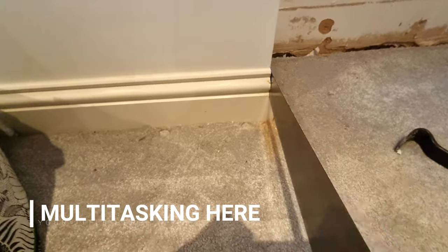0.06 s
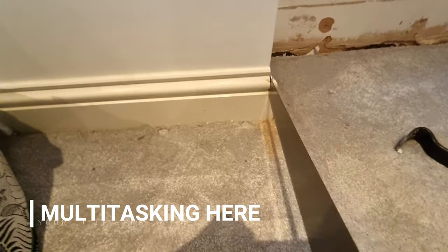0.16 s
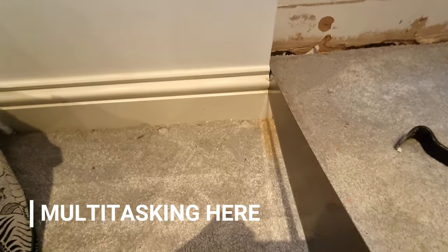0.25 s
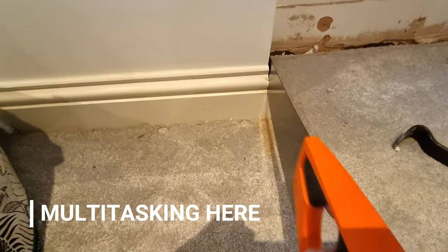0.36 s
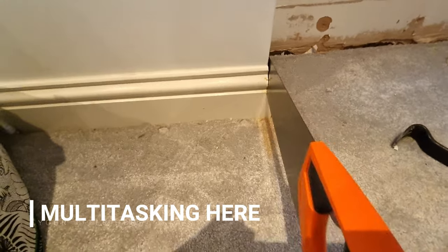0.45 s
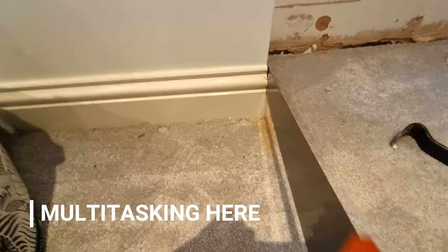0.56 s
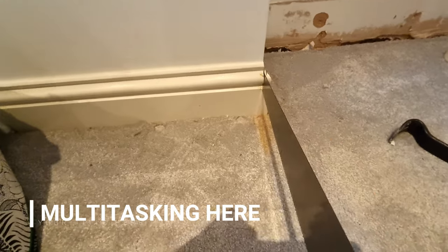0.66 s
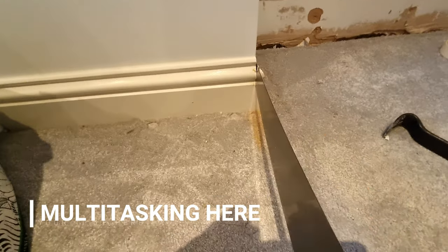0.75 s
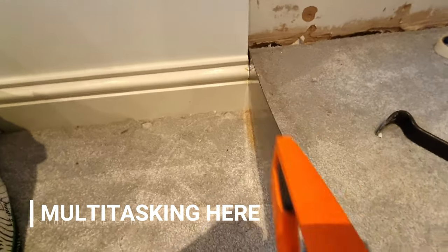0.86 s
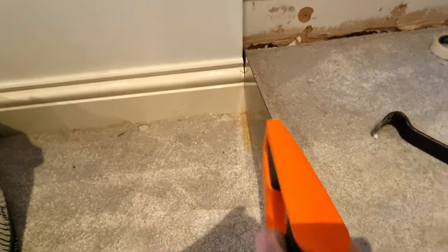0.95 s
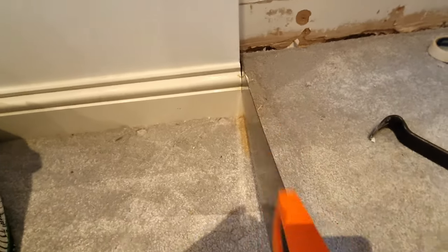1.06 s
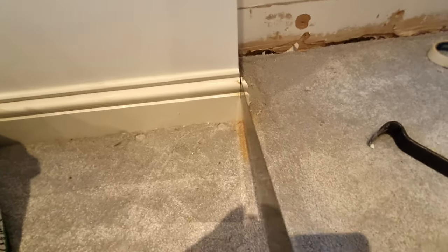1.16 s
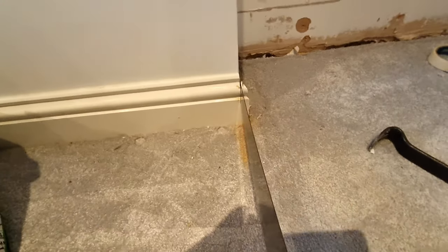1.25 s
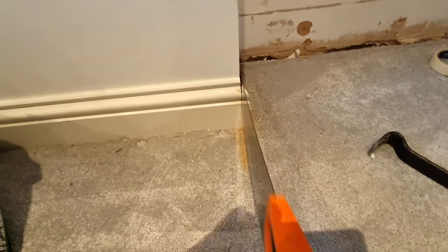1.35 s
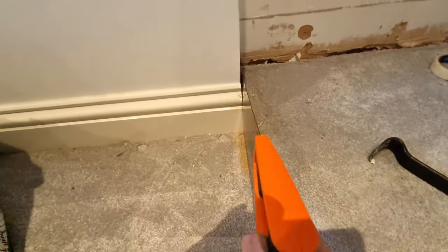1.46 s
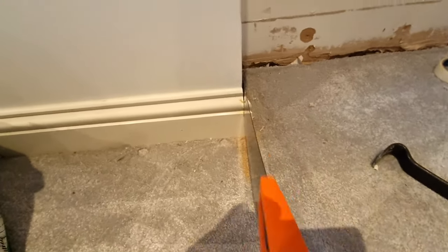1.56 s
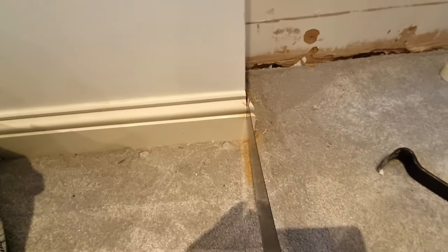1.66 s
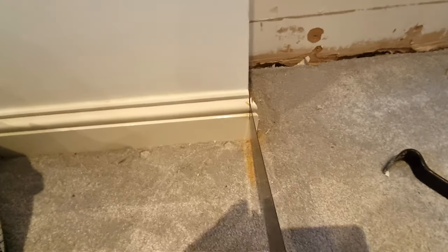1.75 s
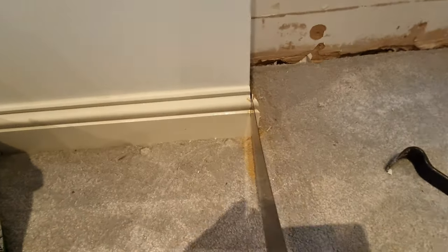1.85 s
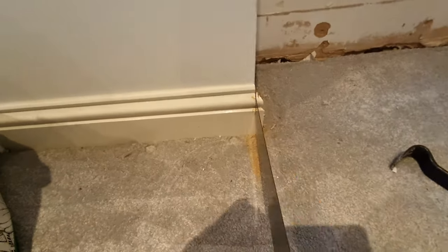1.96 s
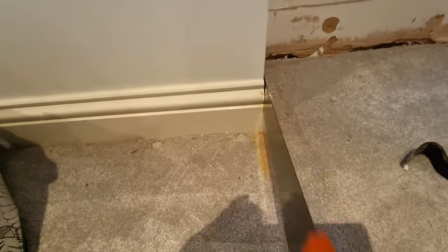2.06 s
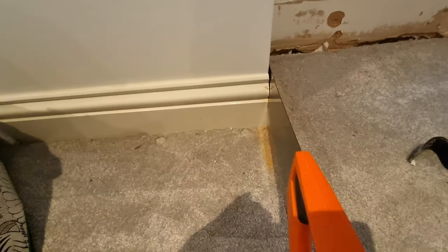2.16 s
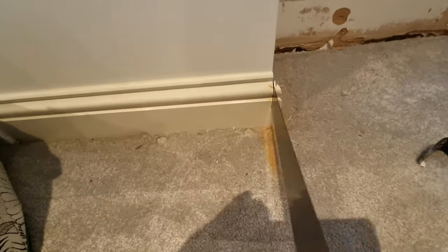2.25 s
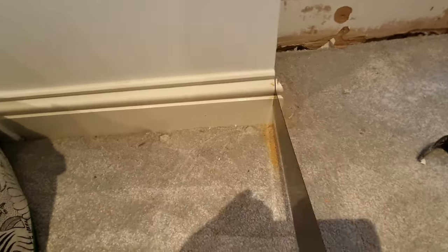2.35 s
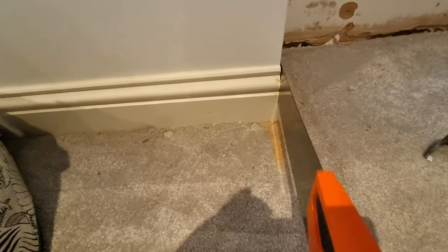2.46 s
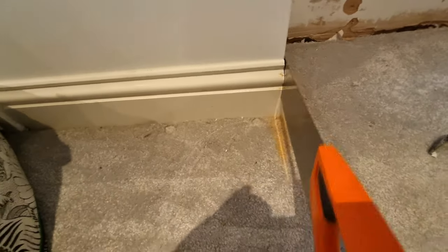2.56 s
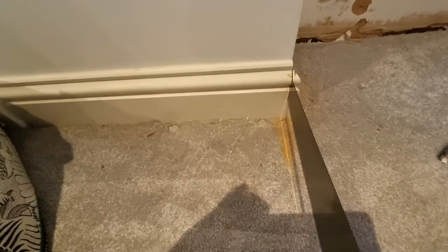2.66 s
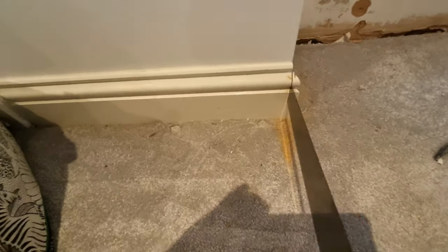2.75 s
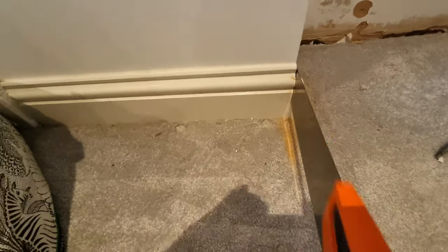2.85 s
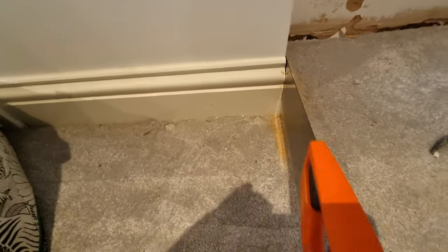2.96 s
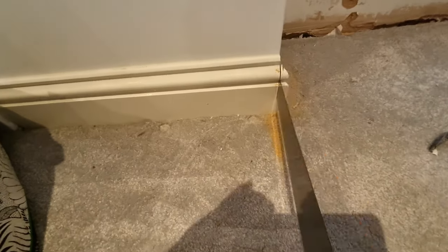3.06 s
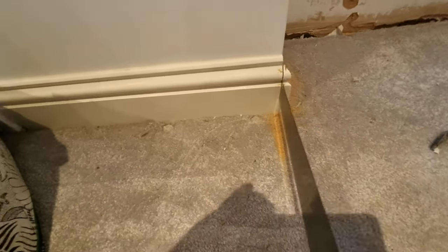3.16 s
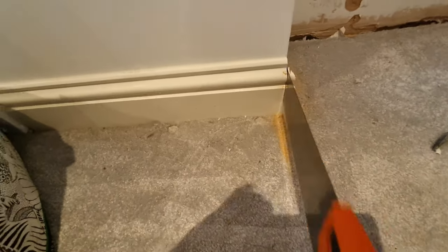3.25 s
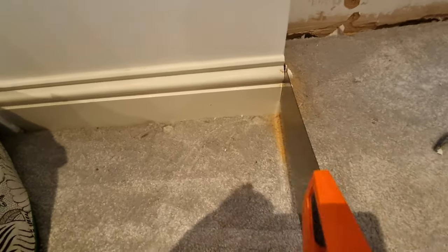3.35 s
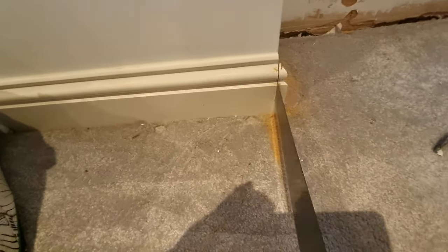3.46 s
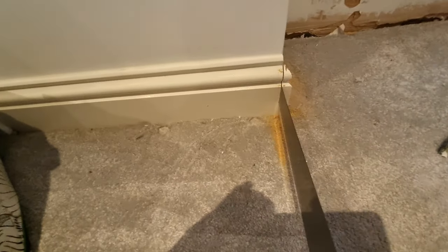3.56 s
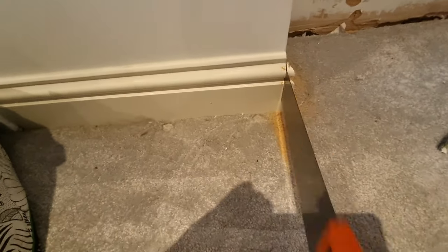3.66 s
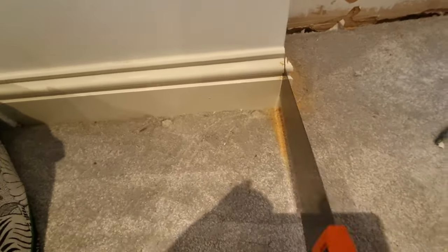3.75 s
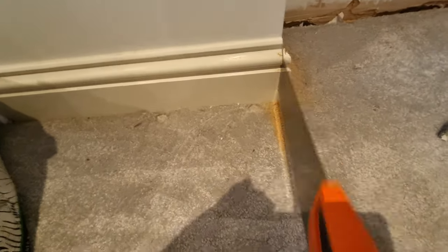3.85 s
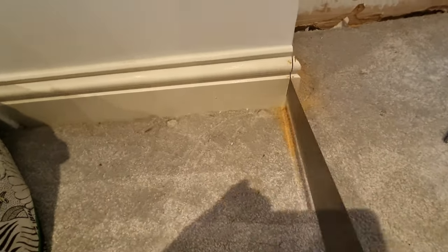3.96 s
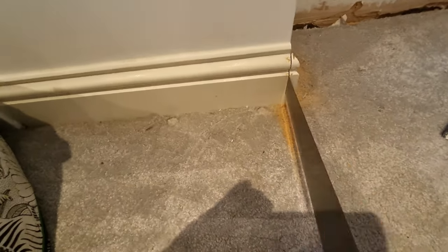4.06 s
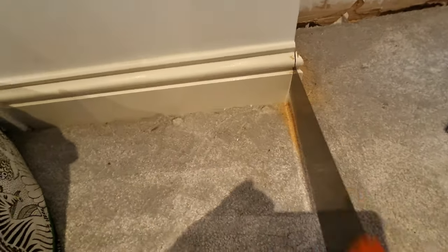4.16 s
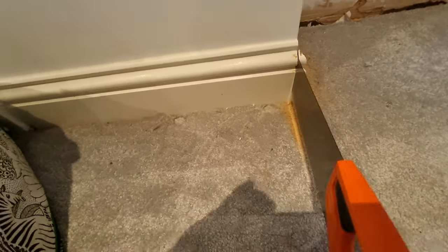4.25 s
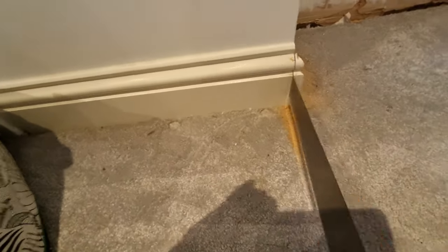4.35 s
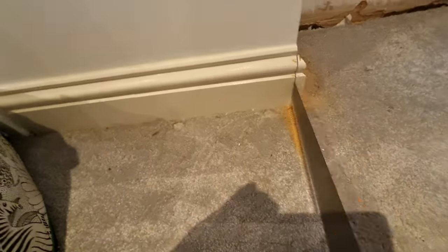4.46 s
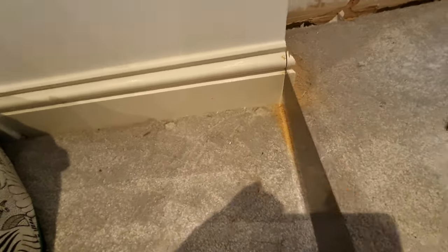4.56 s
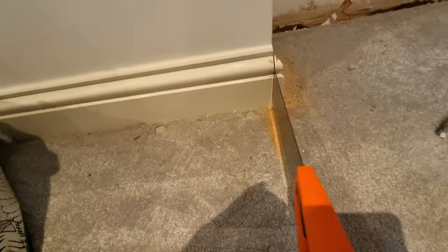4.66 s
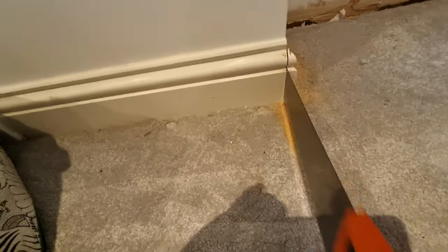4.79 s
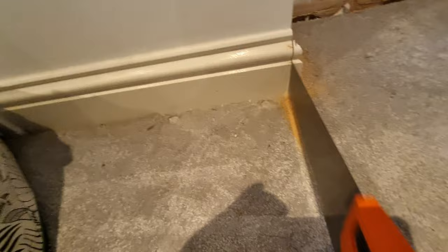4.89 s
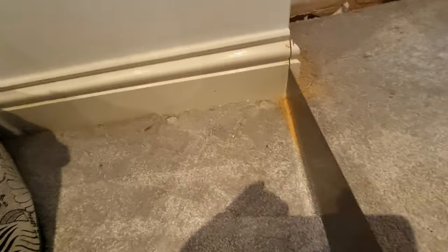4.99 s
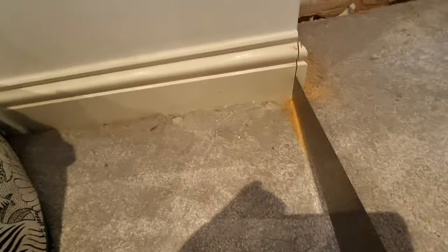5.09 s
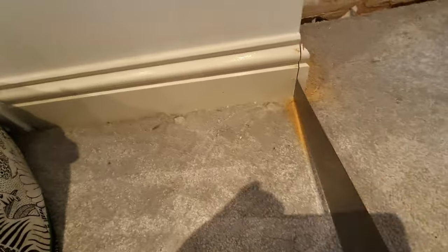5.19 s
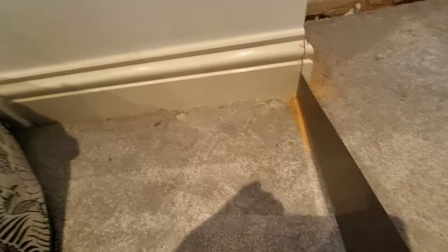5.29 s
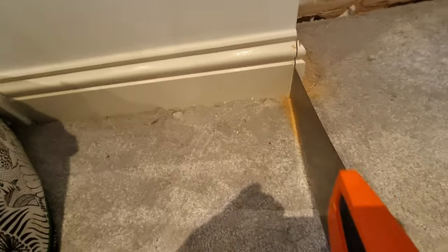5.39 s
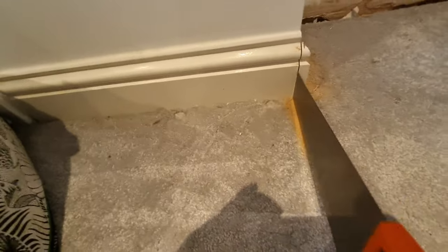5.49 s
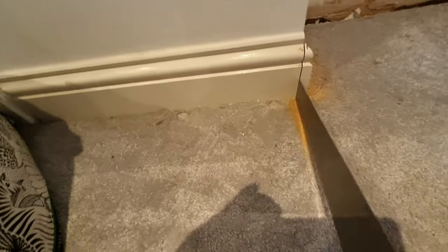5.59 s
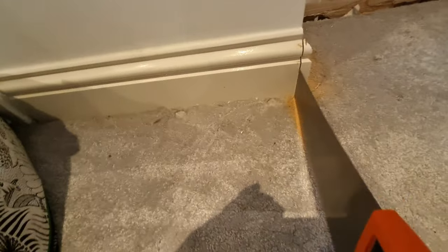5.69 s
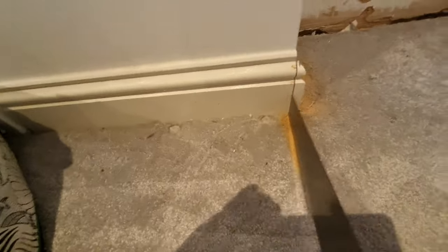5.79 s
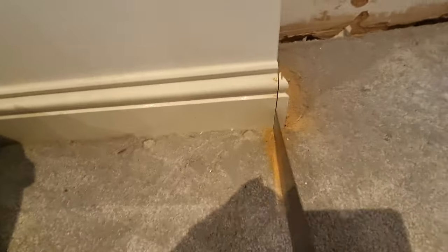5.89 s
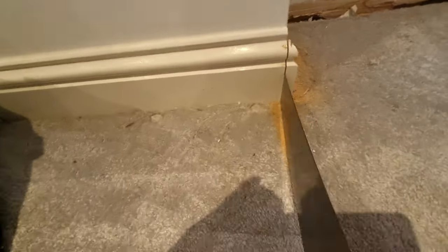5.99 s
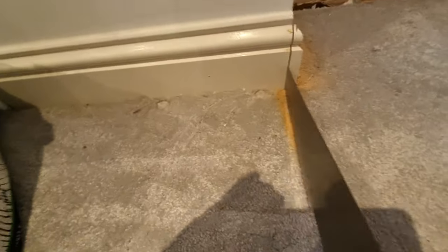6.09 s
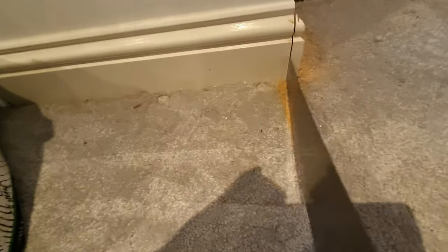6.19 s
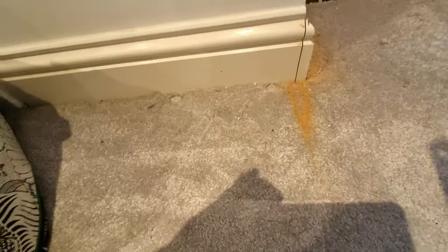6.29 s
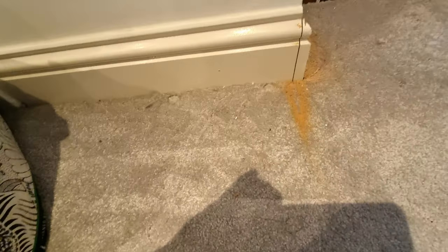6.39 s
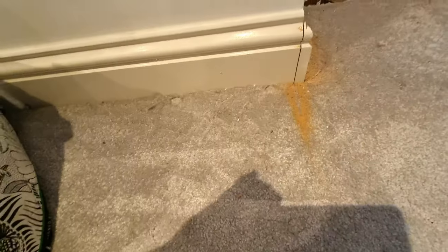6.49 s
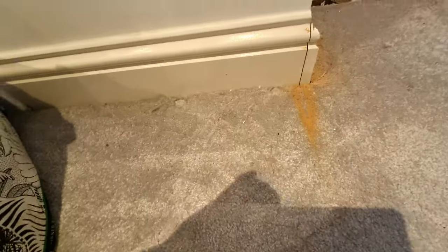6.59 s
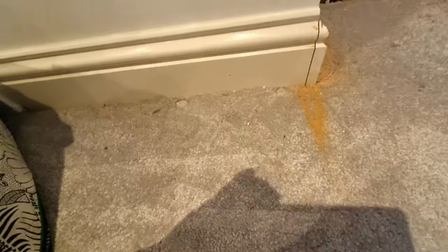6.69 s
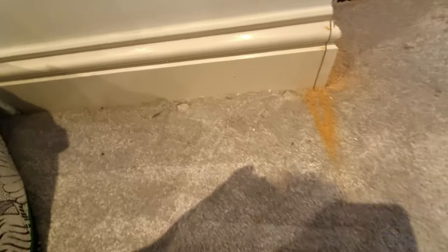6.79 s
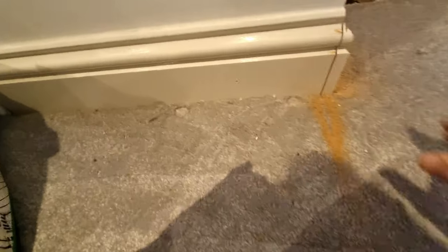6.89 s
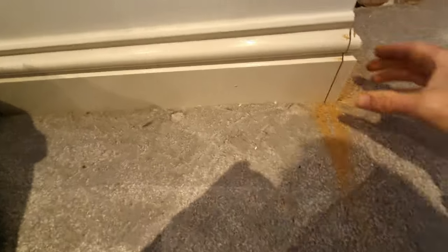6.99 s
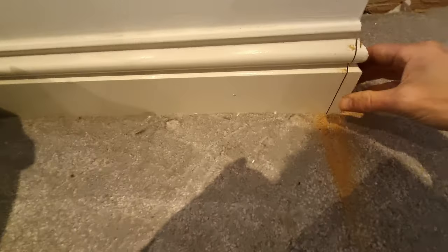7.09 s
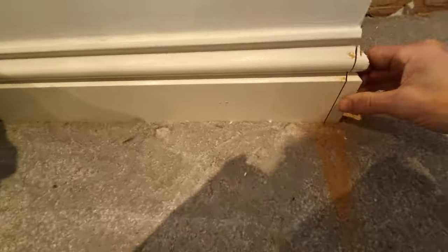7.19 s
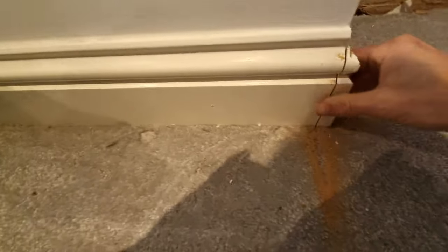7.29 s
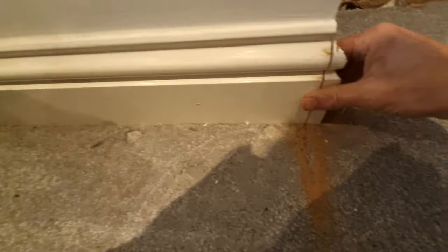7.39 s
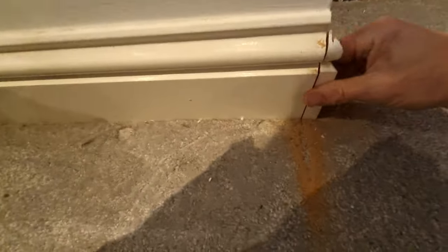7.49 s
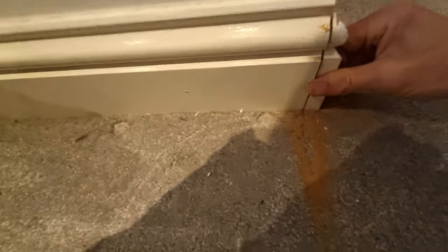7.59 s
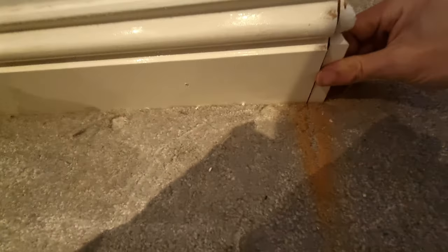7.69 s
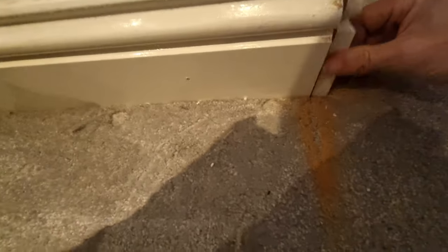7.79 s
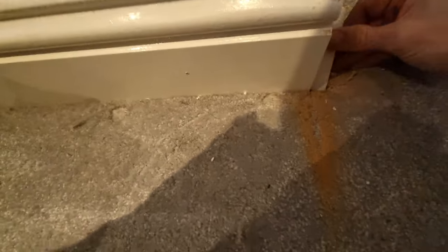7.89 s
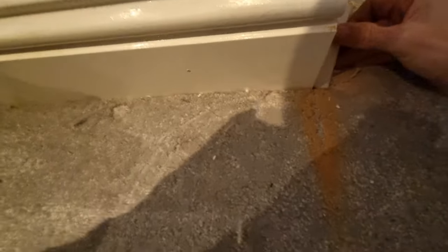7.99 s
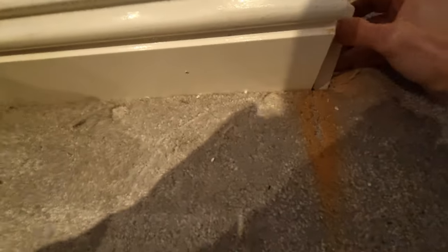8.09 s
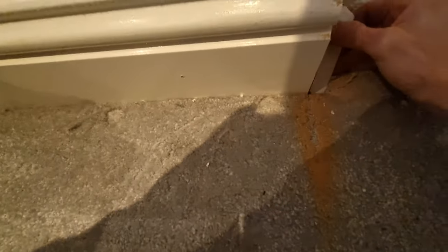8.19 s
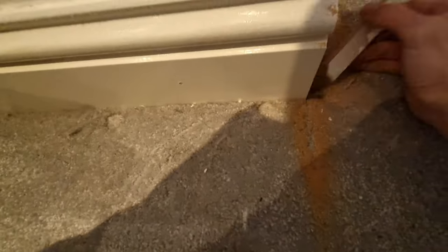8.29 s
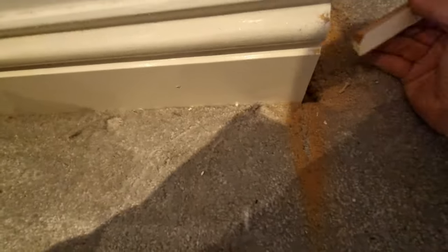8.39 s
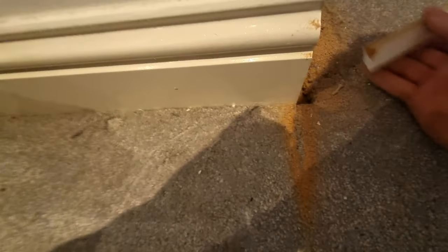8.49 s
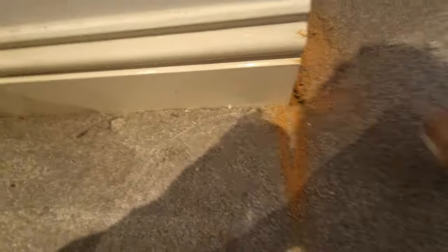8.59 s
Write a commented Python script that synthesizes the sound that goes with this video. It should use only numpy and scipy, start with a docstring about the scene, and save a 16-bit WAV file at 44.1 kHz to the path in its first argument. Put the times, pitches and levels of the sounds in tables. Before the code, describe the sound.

Close up in a small, dry, carpeted room, a handsaw cuts a wooden skirting board. A few long, juddering strokes give way to fast, even back-and-forth rasping, bright with tooth hiss, then shorter, softer and woodier strokes. The saw slides out and is put down with dull thuds. A hand rustles, knocks and grinds the loose piece, and it breaks with a sharp crack.

```python
"""Handsaw through a skirting board

In a carpeted room a saw cuts downwards: a few long strokes, then ever shorter and faster ones.
Tooth noise swells with blade speed and drives blade, board and wall modes; the ring sinks as the cut
nears the floor. The blade squeaks and shudders now and then as gliding tones. The saw is drawn out and
laid down; a hand rocks, snaps off and lifts away the offcut: struck modes, cracks and shaped noise."""
import sys
import numpy as np
from scipy import signal
from scipy.fft import rfft, irfft
from scipy.io import wavfile
from scipy.ndimage import uniform_filter1d

SR = 44100
rng = np.random.default_rng(int(sys.argv[2]) if len(sys.argv) > 2 else 0)


def wav_out(sig):
    """Save sig, one row per channel (or a flat mono array), as 16-bit PCM at SR to the path in sys.argv[1]."""
    wavfile.write(sys.argv[1], SR, np.round(np.clip(np.atleast_2d(sig).T, -1, 1) * 32767).astype(np.int16))


N = 381024
TIME = np.arange(N) / SR
FREQS = np.maximum(np.fft.rfftfreq(N, 1 / SR), 1)

# Levels in the tables are relative: the functions add trims.
# Background noise: (frequency [Hz], level [dB])
ROOM_TONE = [(15, -29), (25, -4.5), (84, -3.5), (301, -20), (373, -13.5), (530, -20.5), (690, -16.5),
             (800, -16.5), (950, -24.5), (1700, -26.5), (6740, -37.5), (8140, -50.5), (16000, -39.5)]
ROOM_TONE_DB = -55.5
# Reverberation: (frequency [Hz], t60 [s])
ROOM_T60 = [(100, 0.13), (1000, 0.13), (4000, 0.11), (15000, 0.093)]
# Stereo tilt of the saw: (frequency [Hz], left minus right [dB])
LEFT_BIAS = [(100, -2), (400, -2.5), (650, 0), (1100, 5), (1350, 2.5), (1800, 5.5), (2800, 2.5),
             (4200, -3.5), (6000, -1), (7800, 1.5), (12000, 1.5), (15000, -1)]
# Noise power common to both sides: (frequency [Hz], share [0-1])
LIKENESS = [(60, 0.64), (250, 0.57), (600, 0.19), (1500, 0.32), (4000, 0.34), (14000, 0.38)]
CUTOFF_HZ = 16000

# Weight shifts on the floor: (time [s], width [s], level [dB])
RUMBLES = [(.345, 0.038, -29.5), (3.685, 0.014, -30.5), (6.46, 0.087, -38), (6.62, 0.031, -31),
           (6.735, 0.068, -26), (7.6, 0.1, -45), (7.98, .04, -54), (8.17, 0.023, -52), (8.54, 0.033, -47),
           (8.64, 0.017, -29)]
# Hand, sleeve and blade slide about: (time [s], width [s], level [dB])
RUSTLES = [(6.385, 0.021, -64), (6.53, 0.032, -35.5), (6.63, 0.02, -49), (6.715, 0.026, -49.5),
           (6.79, 0.045, -48.5), (7.05, 0.079, -63), (7.22, 0.094, -51), (7.33, 0.075, -51.5),
           (7.89, 0.048, -39), (8.18, 0.013, -60), (8.315, 0.022, -37.5), (8.53, 0.043, -54.5)]
# Hand rubs dully over carpet and board: (time [s], width [s], level [dB])
RUBS = [(6.4, 0.033, -45.5), (7.4, 0.1, -50.5), (7.98, .15, -56), (8.17, 0.027, -48), (8.3, 0.073, -61),
        (8.53, 0.053, -46.5)]
# Spectra of these noises: (frequency [Hz], level [dB])
RUMBLE = [(20, -10.5), (55, -1), (85, 6), (140, -14), (300, -23.5), (700, -45)]
RUSTLE = [(150, -5.5), (400, -12), (780, 1), (1200, -1.5), (2400, 0), (4000, -9), (7000, -9), (8500, -21.5),
          (11000, -17.5), (15000, -12)]
RUB = [(130, -5.5), (220, 1.5), (400, 0.5), (560, -7), (790, 3.5), (950, -5.5), (1400, -7), (2500, -19),
       (6000, -38)]

# Thuds: (time [s], level in floor [dB], level in board [dB])
THUDS = [(3.683, -29.5, -35), (6.371, -42, -54), (6.699, -23, -46), (6.72, -31, -44), (7.264, -32.5, -43),
         (7.586, -41, -58), (7.678, -42.5, -62), (7.715, -37, -58)]
# Offcut knocks on the board: (time [s], hollow knock [dB], contact tick [dB])
KNOCKS = [(7.452, -27.5, -59), (7.463, -31, -64), (7.513, -29, -39.5), (7.528, -32, -39), (7.54, -33, -54),
          (7.6415, -47.5, -53), (7.676, -41, -47), (8.078, -43, -48.5), (8.177, -58, -51),
          (8.332, -26.5, -29.5)]
KNOCK_IN_FLOOR_DB = -8.5  # floor's share of a knock
# Teeth catch as a long stroke turns: (time [s], level [dB])
TICKS = [(.016, -29), (.263, -30), (0.501, -20.5), (1.034, -24)]
# Struck modes: (frequency [Hz], level [dB], t60 [s])
FLOOR_MODES = [(75.5, -13.5, 0.24), (107, -10.5, 0.16), (160, -4.5, 0.1), (195, -6, 0.1), (285, -5, 0.085),
               (365, -8, 0.08), (434, 0, 0.038)]
BOARD_MODES = [(515, -11.5, 0.038), (770, 1, 0.026), (900, -3, 0.055), (1025, 1.5, 0.014), (1300, 0, 0.028),
               (1563, -7, 0.045), (2010, -11.5, 0.033)]

# Cracks of wood and paint: (time [s], level [dB])
SNAPS = [(6.5045, -47), (6.533, -34), (7.1705, -39.5), (7.3431, -61), (7.8577, -3.5), (7.87, -8),
         (7.903, -33), (7.975, -47), (8.3339, -33)]
# Modes of the offcut: (frequency [Hz], level [dB], t60 [s])
OFFCUT_MODES = [(1156, -5, 0.012), (1550, -3.5, 0.01), (1960, -9, 0.033), (2610, -13, .016),
                (3205, -5, 0.016), (3840, -0.5, 0.0096), (5900, -36, 0.0075)]
# Crack spectrum: (frequency [Hz], level [dB])
CRACK = [(700, -13.0), (2500, 4.5), (4000, 0), (8000, -7.5), (15000, -11.0)]

# Offcut grinds against wall and floor: resonances (frequency [Hz], width [Hz], level [dB])
GRIND_MODES = [(72.4, 11, 7.5), (160, 29, -2.5), (212, 9.4, 5), (308, 23, 2.5), (371.5, 12, 3),
               (454, 46, -6)]
# Plaster scrape spectrum: (frequency [Hz], level [dB])
SCRAPE = [(450, 7.5), (750, 1), (950, 4), (1300, -4), (1800, -6), (2600, -17), (3500, -34.5)]
GRIND_START_S, GRIND_ATTACK_S, GRIND_HOLD_S = 7.447, 0.013, 0.067  # hold counted from the start
GRIND_DB, GRIND_FALL_DB_PER_S = -29.5, 80
SCRAPE_DB, SCRAPE_FALL_DB_PER_S = -36, 139.5

# Stick-slip of offcut on wall, and of blade in kerf:
# (time [s], half length [s], frequency [Hz], glide over a half length [Hz], level [dB])
GROANS = [(7.456, .014, 862, -34, -22.5), (7.466, .012, 707, -20, -27.5), (7.505, .06, 368.5, 12, -28),
          (7.578, .055, 212, -5, -33.5), (7.587, .012, 935, -200, -45), (7.695, .035, 350, 23, -34)]
SQUEAKS = [(3.07, 0.031, 4810, -130, -16.5), (3.688, 0.018, 529, -58, -27), (6.318, 0.013, 532, 15, -27)]
# Freed blade clinks: (time [s], level [dB])
CLINK = [(6.532, -34.5)]
# Its modes: (frequency [Hz], level [dB], t60 [s])
CLINK_MODES = [(1490, -6.5, 0.066), (2380, 3, 0.035), (2500, -5, 0.06), (3350, -19, 0.035)]

# Saw cycles: (start [s], turn [s], push rasp [dB], pull rasp [dB],
#  board ring over rasp in push [dB], same in pull [dB])
STROKES = [(-0.29, -0.035, -20.0, -24.5, -3.0, -4), (0.24, 0.494, -18, -25, -3, -4),
           (0.769, 1.025, -19, -24.5, -3.5, -4), (1.294, 1.566, -18, -24, -6, -5),
           (1.842, 1.864, -36, -32.5, -2.5, -4), (1.897, 1.958, -18, -26, -4, -6.5),
           (2.025, 2.095, -20, -25, -8.5, -6.5), (2.161, 2.224, -19.5, -22.5, -8.5, -8.5),
           (2.296, 2.367, -19, -24.5, -8, -6.5), (2.43, 2.507, -19.0, -25.5, -7.5, -10),
           (2.567, 2.638, -21.5, -28, -10, -5.5), (2.701, 2.767, -19.5, -27, -10.5, -7),
           (2.834, 2.894, -18.5, -24, -11, -11.5), (2.965, 3.04, -19, -25.5, -11.5, -12),
           (3.1, 3.168, -18.5, -27.5, -9.5, -13), (3.23, 3.297, -20, -25, -11.5, -10),
           (3.362, 3.434, -20.5, -24.0, -8.5, -13), (3.497, 3.564, -18.5, -24, -9, -7),
           (3.628, 3.696, -18.5, -24.5, -12.5, -9), (3.759, 3.816, -19.5, -25, -9.5, -8.5),
           (3.881, 3.942, -18, -26.0, -7, -9.5), (4.009, 4.069, -19.5, -25, -7.5, -9),
           (4.126, 4.19, -18.5, -21.5, -4, -9.5), (4.25, 4.323, -17, -22.5, -2, -7),
           (4.402, 4.47, -23.5, -28, 0.5, -9), (4.526, 4.592, -22.0, -31.5, 0.5, 0),
           (4.651, 4.714, -21, -31, 2, 1.5), (4.768, 4.835, -21, -29.5, 3.5, 3),
           (4.88, 4.942, -21.5, -28, 2.5, -1), (4.978, 5.033, -23, -29, 5.5, 4.5),
           (5.07, 5.121, -21.5, -29, 4.5, 2.5), (5.159, 5.208, -23.5, -28.5, 7, 4.5),
           (5.245, 5.298, -23.5, -28, 6.5, 7), (5.335, 5.388, -23.5, -27.5, 4.5, 5),
           (5.419, 5.465, -26, -27.5, 8.5, 3), (5.499, 5.539, -26.5, -29.5, 7, 2.5),
           (5.581, 5.618, -26, -31, 3, 8.5), (5.65, 5.685, -28, -27.5, 10, 7),
           (5.721, 5.754, -26.5, -29, 2.5, 2), (5.786, 5.821, -26.0, -33.5, 4.5, 3),
           (5.861, 5.903, -27.0, -29.5, 4, 5.5), (5.938, 5.974, -24.5, -27.5, 6.5, 6.5),
           (6.014, 6.048, -23, -28.5, 3.5, 4), (6.086, 6.118, -26.5, -37.5, 6, 4),
           (6.152, 6.19, -27.5, -30, 4.5, 1), (6.241, 6.265, -55, -37, -5, -4)]
SAW_OUT_S = 6.333  # last pull draws the blade out of the kerf
PUSH_FASTEST, PULL_FASTEST = 0.519, 0.59  # base share of a stroke at which speed peaks
LATER_PER_S = 0.14  # added to that share per s of stroke
DWELL = 0.021  # share of each rise and fall of speed spent at rest
LONG_STROKE_S = 0.15
BEAR_DOWN_DB = 3.5  # level rise through a long push: the arm leans in
# Blade stops a moment at a turn: (time [s], half length [s])
STALLS = [(3.82, 0.012), (3.946, 0.01), (4.323, 0.027), (6.122, 0.013), (6.259, 0.017)]
# State of the cut: (time [s], blade share of rasp [0-1], tearing share of force [0-1],
#  wall drumming over skirting [dB])
CUT = [(0, 0.42, 0.57, 10.5), (1.7, 0.47, 0, 1.5), (2.1, 0.62, 0.14, -0.5), (3.2, 0.77, 0.38, -11),
       (4.3, 0.66, 0.6, -9.5), (5, 0.62, 0, -2), (5.6, 0.33, 0, -7.5), (6.3, 0.38, 0.56, -6.5)]
# As the cut deepens: (time [s], tooth hiss over rasp [dB], thrum over rasp [dB])
DEPTH = [(0.0, -4, -23.5), (1.499, -2, -21), (2.2, -3, -26), (3.3, -1.5, -26), (4.1, -2.5, -18),
         (4.7, -2.5, -21.5), (5.2, -0.5, -16.5), (5.6, -2.5, -13.5), (6.2, -2.5, -8.5)]
PULL_HISS_DB, PULL_THRUM_DB = -1.25, 1.1  # extra in pulls
# Tooth noise spectra: (frequency [Hz], level [dB per Hz])
WOOD_RASP = [(1300, -22.5), (1700, 3.5), (1950, 2.5), (2200, 2.5), (2500, 1.5), (2830, 4), (3150, -18),
             (3800, -21.5), (5500, -11.5), (9000, -19)]
BLADE_RASP = [(1600, -27), (2400, -8.5), (3300, 2.5), (3900, -0.5), (4800, -2.5), (6000, -1), (6900, 0.5),
              (7600, -2.5), (8300, -17.5), (10500, -24.5)]
TOOTH_HISS = [(6500, -23), (8300, -13), (9200, -11), (10800, -11), (12000, -6.5), (13500, -2.5),
              (15700, -4.5), (17000, -22)]
BOARD_RING = [(330, -38), (450, -29.5), (530, -12), (620, -8.5), (760, -2), (900, 2.5), (1020, 7),
              (1130, 9), (1260, 8.5), (1600, 8), (1850, -4.5), (2400, -33)]

# Resonances shaken by the saw: (frequency [Hz], width [Hz], level [dB])
WALL_MODES = [(92, 14, 3.5), (155, 24, -0.5), (206, 52, -2.5), (280, 59, -0.5), (560, 90, -12.5)]
SKIRTING_MODES = [(81, 15, 4), (104, 36, -3), (179.6, 32, -2), (217, 48, -5), (363.6, 56, -4),
                  (542.4, 57, 0), (708, 130, -5.5)]
BLADE_MODES = [(1149, 25, -2), (1423, 65, 3), (2090, 50, -0.5), (2377, 40, -7), (2860, 140, -2),
               (3220, 80, 2.5)]
THROB_DB = -18.5  # direct shake of wall and board by the catches

# Board resonance at the cut, read at each turn:
# (time [s], push frequency [Hz], pull frequency [Hz], level over the rest of the ring [dB])
CUT_RING = [(0, 1405, 1355, -0.5), (1.8, 1395, 1400, -3), (2.6, 1447, 1243, 2.5), (2.9, 1457, 1420, -4),
            (3.43, 1300, 1100, -1), (3.9, 1473, 1176, -2), (4.19, 1587, 1244, 7.5), (4.47, 1528, 1297, 8.5),
            (4.59, 1407, 1440, 9.5), (4.72, 1493, 1490, 3.5), (4.83, 1396, 1416, 4.5),
            (5.03, 1340, 1370, 2), (5.21, 1348, 1343, 4), (5.3, 1260, 1320, 2.5), (5.385, 1296, 1450, 0),
            (5.464, 1148, 1162, -1), (5.542, 1074, 1236, -0.5), (5.687, 1226, 1234, 3),
            (5.754, 1124, 1140, 2), (5.903, 1044, 1255, 3), (5.975, 1110, 1233, 7.5),
            (6.118, 1125, 1160, 6), (6.19, 933, 1270, -0.5)]
# Neighbouring modes: (pitch ratio, level [dB])
CUT_PARTNERS = [(0.741, -11), (1.44, -14.5)]
CUT_LIFT_DB = 0.5  # added to the level of the ring at the cut
CUT_STRAY, CUT_GLIDE = 0.006, 0.05  # pitch shares: chance per stroke; fall in a push, rise in a pull
PARTNER_STRAY, PARTNER_VARY_DB = 0.04, 2

# Blade judders in the kerf, faster as a stroke goes on
PUSH_CATCHES_PER_S, PULL_CATCHES_PER_S = 138, 68  # mid-stroke; pull rate in long pulls only
CATCH_RISE = 0.25  # share of the rate gained through a stroke
JUDDER_DB, LONG_PULL_JUDDER_DB = 0.7, 4
JERKS_DB = -23.5  # rap on the board per catch, at full speed
# A tooth snags hard: (time [s], level [dB])
SNAGS = [(0.027, -20.5), (.347, -11.5), (.661, -13.5), (1.1386, -17), (1.1694, -19.5), (1.2254, -23.5),
         (1.377, -17), (1.487, -17), (1.6694, -17)]
# Rapped board modes: (frequency [Hz], level [dB], t60 [s])
JERK_MODES = [(1076, -1, 0.02), (1400, -1, 0.018), (1890, 1.5, 0.014), (2350, -7.5, 0.007),
              (2830, -12.5, 0.013)]
TURN_TICK_S, TURN_TICK_DB = 0.012, -11  # delay after the turn; level over the pull's rasp
# Turn tick spectrum: (frequency [Hz], level [dB])
TURN_TICK = [(1100, 1), (3000, 3.5), (7000, -11.5), (9000, -12), (14000, -4)]

# Blade flaps on hard pushes: (time [s], half length [s], frequency [Hz],
#  glide over a half length [Hz], level [dB], fall per overtone [dB])
SHUDDERS = [(0.355, .065, 144, 8.5, -31.5, 6.5), (0.888, 0.082, 143.5, 4, -34, 5),
            (1.402, 0.063, 141.2, 12.5, -35.5, 6), (1.931, 0.037, 129, -36, -34, 8.5),
            (2.328, 0.029, 147.4, 16.5, -32.5, 12.5), (2.471, 0.029, 147, -5, -33, 13),
            (2.733, 0.023, 144.7, -12, -39.5, 5.5), (2.865, .03, 169, 12.5, -42.5, 19.5),
            (3.13, 0.026, 155, 13, -36, 11), (4.44, .025, 134, 28, -38.5, 14),
            (4.91, .025, 160, 0, -42, 10), (5.005, .025, 160, -22, -38.5, 15)]
# Blade hum: (time [s], level [dB])
HUM_LEVEL = [(0, -63.5), (1.8, -60.5), (2.2, -53.5), (3.8, -56.5), (4.6, -63.5)]
HUM_HZ, HUM_WIDTH_HZ = 535.4, 14  # low bending mode of the blade


def from_db(db):
    """Decibels to gain."""
    return 10 ** (np.asarray(db) / 20)


def rms_one(x):
    """Scale to unit power."""
    return x / np.sqrt(np.mean(x ** 2) + 1e-20)


def in_time(rows):
    """Interpolate curve columns at every sample."""
    s, *columns = np.transpose(rows)
    return [np.interp(TIME, s, column) for column in columns]


def at_hz(points, hz):
    """Read a table on a log-frequency axis."""
    table_hz, values = np.transpose(points)
    return np.interp(np.log(hz), np.log(table_hz), values)


def drift(rate_hz):
    """Smooth random curve, rms 1, changing about rate_hz times a second."""
    return rms_one(irfft(rfft(rng.standard_normal(N)) / (1 + (FREQS / rate_hz) ** 2), N))


def band_limits(spectrum):
    """Steep slopes: half gain at the lowest point and at twice the highest."""
    low_hz, high_hz = spectrum[0][0], 2 * spectrum[-1][0]
    return 1 / (1 + (low_hz / FREQS) ** 4) / (1 + (FREQS / high_hz) ** 4)


def colour(x, spectrum):
    """Filter a flat sound to a spectrum; rms 1."""
    gain = from_db(at_hz(spectrum, FREQS)) * band_limits(spectrum)
    return rms_one(irfft(rfft(x) * gain, N))


def stereo_noise(in_phase_hz=1200):
    """White noise: a common part whose phases swing apart and back with frequency, plus a diffuse part."""
    common, *own = rfft(rng.standard_normal((3, N)))
    share = np.clip(at_hz(LIKENESS, FREQS), 0, 1)
    apart_rad = 2.4 * np.sin(np.pi * (FREQS / in_phase_hz) ** 1.5)
    direct = common * np.exp(1j * apart_rad * np.array([[0.5], [-0.5]]))
    return irfft(np.sqrt(share) * direct + np.sqrt(1 - share) * np.array(own), N)


def ring(clicks, hz, t60_s):
    """Two-pole resonator: a unit click starts a decaying sine of height 1."""
    r = np.exp(-np.log(1000) / (t60_s * SR))
    w = 2 * np.pi * hz / SR
    return signal.lfilter([0, np.sin(w)], [1, -2 * r * np.cos(w), r * r], clicks + 1e-18)


def strike(times_s, levels_db, modes, vary_db):
    """Each blow excites each mode, with a chance strength per side."""
    out = np.zeros((2, N))
    at = np.round(times_s * SR).astype(int)
    for k, (hz, mode_db, t60_s) in enumerate(modes):
        clicks = np.zeros((2, N))
        chance_db = vary_db * rng.standard_normal((len(at), 2)).T
        clicks[:, at] = from_db(levels_db + mode_db + chance_db)
        out += ring(clicks, hz, t60_s) * (-1) ** k
    return out


def bursts(times_s, levels_db, t60_s):
    """Envelope that jumps at each blow and decays."""
    clicks = np.zeros(N)
    clicks[np.round(times_s * SR).astype(int)] = from_db(levels_db)
    return signal.lfilter([1], [1, -np.exp(-np.log(1000) / (t60_s * SR))], clicks + 1e-18)


def swells(rows):
    """Envelope of movements that rise exponentially to a peak and fall away; powers add."""
    return np.sqrt(sum((from_db(level_db) * np.exp(-abs(TIME - s) / width_s)) ** 2
                       for s, width_s, level_db in rows))


def resonances(drive, modes):
    """Parallel two-pole resonators on a continuous drive; rms 1."""
    out = 0
    for k, (hz, width_hz, mode_db) in enumerate(modes):
        r = np.exp(-np.pi * width_hz / SR)
        poles = [1, -2 * r * np.cos(2 * np.pi * hz / SR), r * r]
        gain = (-1) ** k * from_db(mode_db) * (1 - r * r)
        out = out + gain * signal.lfilter([1, 0, -1], poles, drive)
    return rms_one(out)


def room_tone():
    """Steady background noise with a fixed spectrum."""
    return from_db(ROOM_TONE_DB) * colour(stereo_noise(), ROOM_TONE)


def room(x, first_echo_s=0.0044):
    """Diffuse reflections as decaying noise bands, shorter in the treble; unit gain."""
    t = TIME[:SR // 2]
    edges_hz = np.geomspace(40, 19000, 9)
    tail = 0
    for low_hz, high_hz in zip(edges_hz, edges_hz[1:]):
        sos = signal.butter(2, [low_hz, high_hz], "band", fs=SR, output="sos")
        band = signal.sosfilt(sos, rng.standard_normal((2, len(t))))
        t60_s = at_hz(ROOM_T60, np.sqrt(low_hz * high_hz))
        tail = tail + band * np.exp(-np.log(1000) * t / t60_s)
    tail = rms_one(tail * (t > first_echo_s)) / np.sqrt(len(t))
    return signal.fftconvolve(x, tail, axes=1)[:, :N]


def handling(grain_db=2.5):
    """Floor rumble, grainy rustle and dull rubbing: noise shaped by slow movements."""
    rumble = from_db(-3.5) * swells(RUMBLES) * colour(stereo_noise(), RUMBLE)
    rustle = from_db(grain_db * drift(70) - 2.0) * swells(RUSTLES) * colour(stereo_noise(), RUSTLE)
    rub = from_db(2.0 * drift(30)) * swells(RUBS) * colour(stereo_noise(), RUB)
    return rumble + rustle + rub


def knocks():
    """Blows ring floor modes dully and board modes hollowly; contacts tick as short noise."""
    thud_s, thud_db, board_db = np.transpose(THUDS)
    knock_s, knock_db, contact_db = np.transpose(KNOCKS)
    tick_s, tick_db = np.transpose(TICKS)
    blow_s = np.append(thud_s, knock_s)
    floor_db = np.append(thud_db, knock_db + KNOCK_IN_FLOOR_DB)
    thuds = from_db(-1.5) * strike(blow_s, floor_db, FLOOR_MODES, vary_db=6.5)
    hollow = from_db(-1.5) * strike(blow_s, np.append(board_db, knock_db), BOARD_MODES, vary_db=3.0)
    ticks = bursts(np.append(tick_s, knock_s), np.append(tick_db, contact_db), t60_s=0.05)
    return thuds + hollow + ticks * colour(stereo_noise(), RUSTLE)


def snap():
    """Breaking fibres give noise cracks and ring the offcut for an instant."""
    s, level_db = np.transpose(SNAPS)
    crack = bursts(s, level_db, t60_s=0.013) * colour(stereo_noise(), CRACK)
    offcut = strike(s, level_db, OFFCUT_MODES, vary_db=0.0)
    return from_db(-2.5) * offcut + from_db(-1.5) * crack


def grinding(slip_db=2.5, lurch_db=3.0):
    """Uneven slips of the offcut shake the floor and scrape the plaster: grip, hold, work loose."""
    grip = np.clip((TIME - GRIND_START_S) / GRIND_ATTACK_S, 0, 1)
    loose_s = np.maximum(TIME - GRIND_START_S - GRIND_HOLD_S, 0)
    slips = from_db(slip_db * drift(120) + lurch_db * drift(25))
    grind_gain = from_db(GRIND_DB - GRIND_FALL_DB_PER_S * loose_s)
    scrape_gain = from_db(SCRAPE_DB - SCRAPE_FALL_DB_PER_S * loose_s)
    grind = grind_gain * resonances(slips * stereo_noise(), GRIND_MODES)
    scrape = scrape_gain * colour(slips * stereo_noise(), SCRAPE)
    return grip * (grind + scrape)


def squeaks(rows, waver):
    """Brief stick-slip tones: gliding sines with an unsteady pitch."""
    out = np.zeros((2, N))
    wobble = 1 + waver * drift(170)
    for s, half_s, hz, glide_hz, level_db in rows:
        near = abs(TIME - s) < half_s
        u = (TIME[near] - s) / half_s
        phase = 2 * np.pi * np.cumsum((hz + glide_hz * u) * wobble[near]) / SR
        tone = np.sin(phase + np.array([[0], [1]]))  # sides 1 rad apart
        out[:, near] += from_db(level_db) * np.cos(np.pi / 2 * u) ** 4 * tone
    return out


def clink():
    """Struck modes of the blade as it comes free."""
    s, level_db = np.transpose(CLINK)
    return strike(s, level_db, CLINK_MODES, vary_db=8.0)


def stroke_clock():
    """Stroke index (even = push, odd = pull), stroke length [s] and progress [0-1]."""
    ends_s = np.append(np.array(STROKES)[:, :2], SAW_OUT_S)
    k = np.clip(np.searchsorted(ends_s, TIME) - 1, 0, len(ends_s) - 2)
    length_s = np.diff(ends_s)[k]
    return k, length_s, np.clip((TIME - ends_s[k]) / length_s, 0, 1)


def stroke_motion(reach_s=0.3345, drive=0.55):
    """Blade speed (0 at each turn, 1 at full swing) and stroke index."""
    k, length_s, progress = stroke_clock()
    fastest = np.where(k % 2, PULL_FASTEST, PUSH_FASTEST) + LATER_PER_S * length_s
    fastest = np.clip(fastest, 0.2, 0.8)
    swing = np.where(progress < fastest, progress / fastest, (1 - progress) / (1 - fastest))
    cruise = drive + length_s / reach_s  # top speed is held longest in long strokes
    moving = np.clip((swing - DWELL) / (1 - DWELL), 0, 1)
    stalled = np.max([np.exp(-((TIME - s) / half_s) ** 4) for s, half_s in STALLS], axis=0)
    return (1 - stalled) * np.tanh(cruise * np.sin(np.pi / 2 * moving)) / np.tanh(cruise), k


def blade_hum():
    """A low bending mode of the blade, rung by noise that follows blade speed."""
    speed, _ = stroke_motion()
    level_db, = in_time(HUM_LEVEL)
    drive = speed * (TIME < SAW_OUT_S) * stereo_noise()
    return from_db(level_db) * resonances(drive, [(HUM_HZ, HUM_WIDTH_HZ, 0)])


def shudders(waver=0.041, rough_db=1.0):
    """The blade flaps in the kerf and the wall booms: four harmonics of a gliding pitch."""
    out = np.zeros((2, N))
    wobble = 1 + waver * drift(40)
    rough = from_db(rough_db * drift(50))
    for s, half_s, hz, glide_hz, level_db, fall_db in SHUDDERS:
        near = abs(TIME - s) < half_s
        u = (TIME[near] - s) / half_s
        phase = 2 * np.pi * np.cumsum((hz + glide_hz * u) * wobble[near]) / SR
        envelope = rough[near] * np.cos(np.pi / 2 * u) ** 2
        for n in range(4):
            tone = np.sin((n + 1) * phase + np.array([[0], [0.5]]))
            out[:, near] += from_db(level_db - fall_db * n) * envelope * tone
    return out


def turn_ticks():
    """Teeth catch lightly just after each push turns into a pull: short noise bursts."""
    _, turn_s, _, pull_db, _, _ = np.array(STROKES)[1:-1].T
    envelope = bursts(turn_s + TURN_TICK_S, pull_db + TURN_TICK_DB, t60_s=0.073)
    return envelope * colour(stereo_noise(), TURN_TICK)


def judder(jitter=0.06, snap_share=0.54):
    """Near-periodic catch and release: gain (unit power) and the samples of catches in long pulls."""
    k, length_s, progress = stroke_clock()
    long_pull = (k % 2 == 1) & (length_s > LONG_STROKE_S)
    per_s = np.where(long_pull, PULL_CATCHES_PER_S, PUSH_CATCHES_PER_S)
    per_s = per_s * (1 + CATCH_RISE * (progress - 0.5))
    phase = 2 * np.pi * np.cumsum(per_s * (1 + jitter * drift(25))) / SR
    depth_db = np.where(long_pull, LONG_PULL_JUDDER_DB * np.sin(np.pi * progress), JUDDER_DB)
    gain = from_db(depth_db * (np.cos(phase) + snap_share * np.cos(2 * phase)))
    new_cycle = np.diff((phase + 1) // (2 * np.pi), prepend=0) > 0
    catches = np.flatnonzero(long_pull & new_cycle)
    return gain / np.sqrt(uniform_filter1d(gain ** 2, size=2000)), catches


def jerks(catches, speed):
    """Each catch of a long pull, and each hard snag, raps the board modes."""
    snag_s, snag_db = np.transpose(SNAGS)
    level_db = JERKS_DB + 20 * np.log10(speed[catches] ** 2 + 1e-3)
    times_s = np.append(catches / SR, snag_s)
    return strike(times_s, np.append(level_db, snag_db), JERK_MODES, vary_db=0.0)


def teeth(speed, tearing, per_s=1000, size_db=1.0, tear_s=0.00081):
    """Tooth force: fibres of chance size tear, more often at speed, over steady rubbing."""
    sizes = from_db(size_db * np.minimum(rng.exponential(1, N), 2.2))
    bites = (rng.random(N) < per_s * (speed + 0.3) / SR) * sizes ** 2
    power = signal.lfilter([1], [1, -np.exp(-2 / (tear_s * SR))], bites)
    share = np.clip(tearing, 0, 1)
    return np.sqrt(1 - share + share * power / power[speed > 0.5].mean())


def cut_resonance(force, hz, width_hz):
    """Narrow noise band that follows a moving pitch: shift down, low-pass, shift back; rms 1."""
    turn = np.exp(2j * np.pi * np.cumsum(hz) / SR)
    sos = signal.butter(2, width_hz / 2, fs=SR, output="sos")
    body = signal.sosfilt(sos, force * stereo_noise() / turn)
    return rms_one((body * turn).real)


def cut_modes(force):
    """Board ring at the cut with neighbours, repitched each stroke; also its dB over the rest."""
    k, _, progress = stroke_clock()
    at_turn = np.clip(np.array(STROKES)[k // 2, 1] * SR, 0, N - 1).astype(int)
    push_hz, pull_hz, cut_db = (column[at_turn] for column in in_time(CUT_RING))

    def each_stroke():
        """One chance value per push and pull."""
        return np.clip(rng.standard_normal(2 * len(STROKES)), -2, 2)[k]

    glide = CUT_GLIDE * np.where(k % 2, 1, -1) * (progress - 0.5)
    hz = np.where(k % 2, pull_hz, push_hz) * (1 + CUT_STRAY * each_stroke() + glide)
    out = cut_resonance(force, hz, width_hz=107)
    for ratio, level_db in CUT_PARTNERS:
        gain = from_db(level_db + PARTNER_VARY_DB * each_stroke())
        partner_hz = hz * ratio * (1 + PARTNER_STRAY * each_stroke())
        out = out + gain * cut_resonance(force, partner_hz, width_hz=84)
    return rms_one(out), cut_db + CUT_LIFT_DB


def blade_ring(force, speed, k, bend=0.05, stray=0.025):
    """Blade modes whose pitch bends as the free length changes with each push and pull."""
    glide = np.where(k % 2, 1, -1) * (speed - 0.5)
    pitch = 1 + bend * glide + stray * rng.standard_normal(2 * len(STROKES))[k]
    position = np.cumsum(pitch / pitch.mean())  # varied playback of a steady ring
    steady = resonances(stereo_noise(), BLADE_MODES)
    return np.sqrt(force) * np.array([np.interp(position, np.arange(N), side) for side in steady])


def blade_echo(x, near_s=0.001102, travel_s=0.000896, echo_db=-9):
    """Waves return from the blade tip; the delay sweeps with travel and shifts the colour."""
    k, _, progress = stroke_clock()
    depth = 0.5 - 0.5 * np.cos(np.pi * (k + progress))
    delay_s = near_s + travel_s * (depth + 0.3 * drift(6))
    echo = np.array([np.interp(TIME - delay_s, TIME, side) for side in x])
    return rms_one(x + from_db(echo_db) * echo)


def flex(x, patchy_db=2.5, changes_per_s=14, count=12):
    """As the blade bends and twists, narrow spectral regions swell and fade on their own."""
    centres = np.log(np.geomspace(800, 5500, count))
    spectrum, out = rfft(x), x
    for centre in centres:
        share = np.maximum(1 - abs(np.log(FREQS) - centre) / (centres[1] - centres[0]), 0)
        gain = rms_one(from_db(patchy_db * np.clip(drift(changes_per_s), -2, 2)))
        out = out + (gain - 1) * irfft(spectrum * share, N)
    return out


def saw(unsteady_db=1.53, rasp_power=1.51, hiss_power=1.56, ring_power=1.75, ring_on=0.056,
        thrum_power=0.87, hiss_judder=0.39):
    """Teeth drive blade, board and wall; each part swells with a power of blade speed."""
    speed, k = stroke_motion()
    _, length_s, progress = stroke_clock()
    _, _, push_db, pull_db, push_ring_db, pull_ring_db = np.array(STROKES)[k // 2].T
    pull = k % 2
    lean_db = BEAR_DOWN_DB * (length_s > LONG_STROKE_S) * (1 - pull) * (progress - 0.5)
    rasp_db = np.where(pull, pull_db, push_db) + lean_db
    ring_db = rasp_db + np.where(pull, pull_ring_db, push_ring_db)
    hiss_over_db, thrum_over_db = in_time(DEPTH)
    hiss_db = rasp_db + hiss_over_db + PULL_HISS_DB * pull
    thrum_db = rasp_db + thrum_over_db + PULL_THRUM_DB * pull
    blade_share, tearing, wall_db = in_time(CUT)
    blade_share = np.clip(blade_share, 0, 1)
    bite = teeth(speed, tearing) * from_db(unsteady_db * np.clip(drift(30), -2, 2))
    catch, catches = judder()
    force = bite * catch

    def swell(level_db, power, rest=0.016):
        """Speed envelope at a level; rest sounds on through the turn."""
        level = uniform_filter1d(from_db(level_db) * (TIME < SAW_OUT_S), size=300)
        return (speed ** power + rest) * level

    def driven(spectrum, drive):
        """One part of the assembly shaken by the teeth."""
        return colour(drive * stereo_noise(), spectrum)

    def drumming(envelope, modes):
        """Low modes that ring on past the turn."""
        shaken = envelope * (force * stereo_noise() + from_db(THROB_DB) * catch ** 2)
        return np.sqrt(np.mean(envelope ** 2)) * resonances(shaken, modes)

    cut, cut_db = cut_modes(force)
    blade_rasp = np.sqrt(blade_share) * driven(BLADE_RASP, bite * np.sqrt(catch))
    wood_rasp = np.sqrt(1 - blade_share) * driven(WOOD_RASP, force)
    rasp = flex(blade_echo(blade_rasp + wood_rasp)) + from_db(-7.0) * blade_ring(force, speed, k)
    board = (driven(BOARD_RING, force) + from_db(cut_db) * cut) / np.hypot(1, from_db(cut_db))
    hiss = driven(TOOTH_HISS, bite * catch ** hiss_judder)
    shake = swell(thrum_db, thrum_power) / np.hypot(1, from_db(wall_db))
    thrum = drumming(shake * from_db(wall_db), WALL_MODES) + drumming(shake, SKIRTING_MODES)
    # floor gives under the working body
    sway = colour(stereo_noise(), RUMBLE) * swell(thrum_db, thrum_power)
    return (from_db(-1.56) * rasp * swell(rasp_db, rasp_power)
            + from_db(-0.06) * board * swell(ring_db, ring_power, rest=ring_on)
            + from_db(0.48) * hiss * swell(hiss_db, hiss_power)
            + from_db(2.5) * thrum + from_db(-11.0) * sway + jerks(catches, speed))


def scene():
    """Background, handling, blows and saw, with reflections of blows and saw."""
    tilt = from_db(at_hz(LEFT_BIAS, FREQS) * np.array([[0.5], [-0.5]]))
    sawing = irfft(rfft(saw() + turn_ticks()) * tilt, N) + shudders() + blade_hum()
    blows = knocks() + snap() + grinding() + squeaks(GROANS, waver=0.035) + clink()
    reflections = room(from_db(-9.5) * sawing + from_db(-13.5) * blows)
    blade_squeaks = squeaks(SQUEAKS, waver=0.0087)
    return room_tone() + handling() + reflections + blows + blade_squeaks + sawing


def record(dry):
    """Clip at full scale, then low-pass steeply."""
    sos = signal.ellip(12, 0.1, 70, CUTOFF_HZ, fs=SR, output="sos")
    return signal.sosfilt(sos, np.clip(dry, -1, 1))


dry = scene()
out = record(dry)
wav_out(out)
```